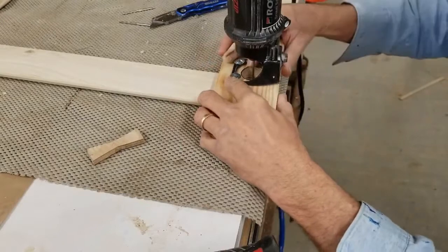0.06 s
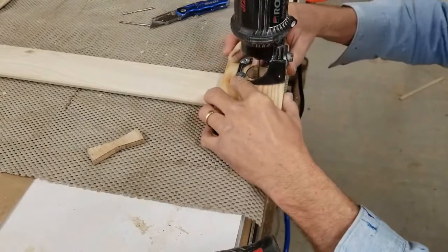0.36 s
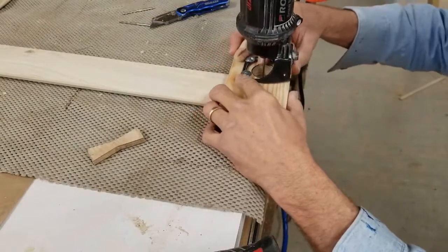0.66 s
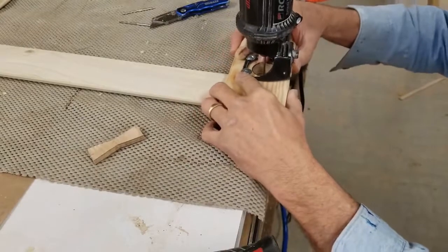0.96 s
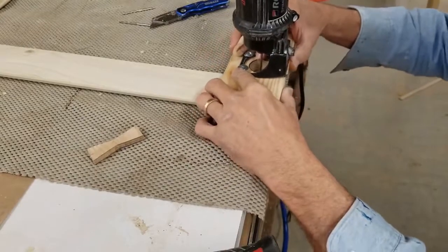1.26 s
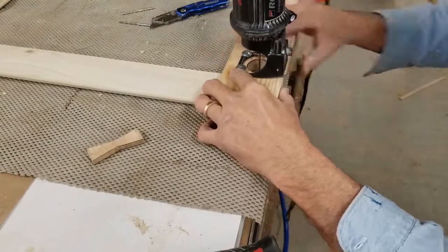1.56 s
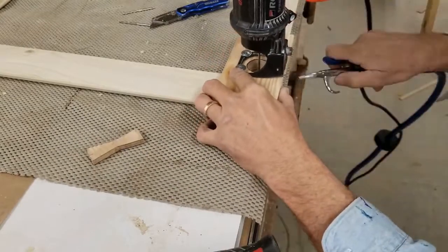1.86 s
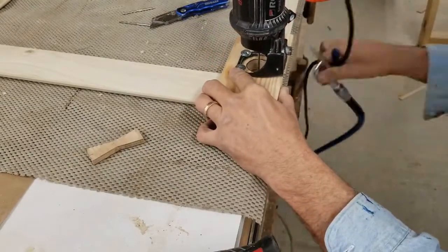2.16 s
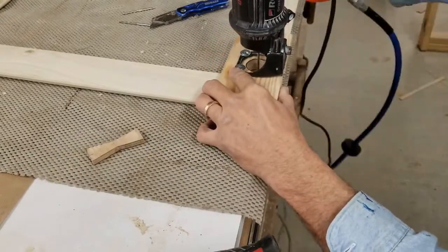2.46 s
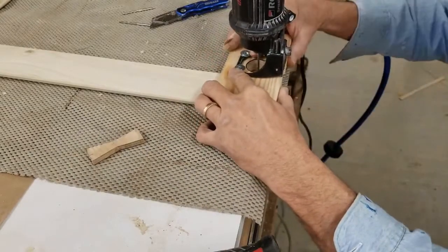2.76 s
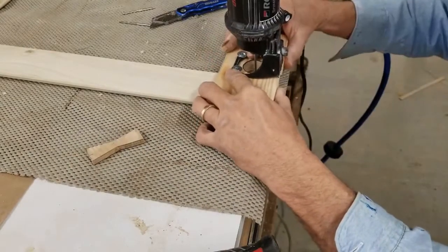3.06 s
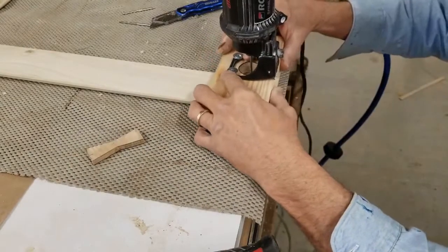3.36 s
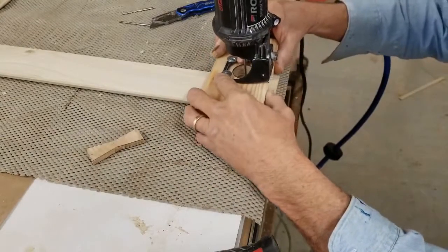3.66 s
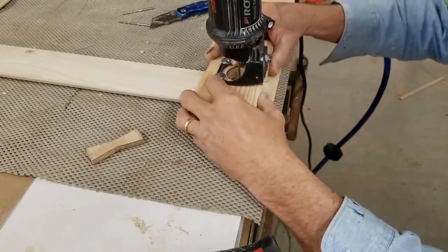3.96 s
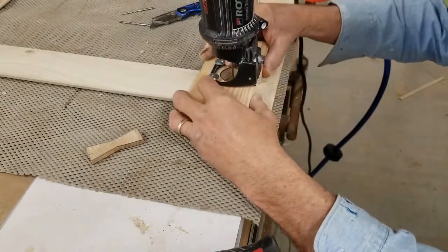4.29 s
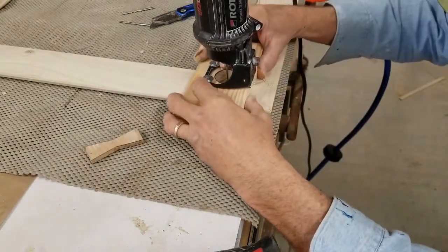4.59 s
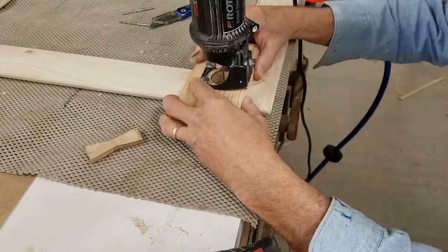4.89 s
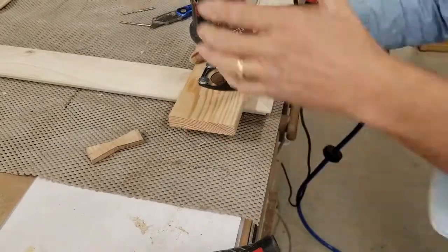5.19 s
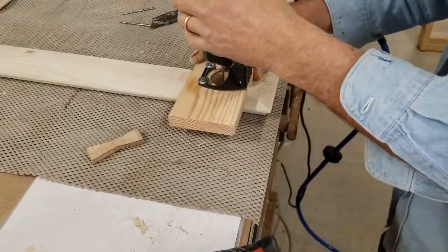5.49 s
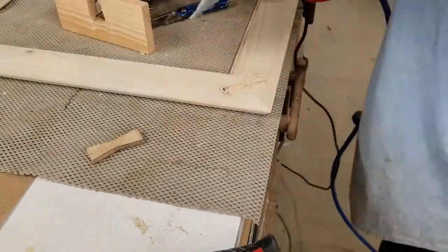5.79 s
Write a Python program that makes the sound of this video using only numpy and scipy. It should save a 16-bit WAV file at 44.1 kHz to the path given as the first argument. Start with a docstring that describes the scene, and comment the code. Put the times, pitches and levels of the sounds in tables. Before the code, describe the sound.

Close by, a small router cuts into a wooden frame in repeated pushes, whining and chattering until its motor is switched off and runs down.

```python
"""At a workbench in a quiet workshop, a small handheld router cuts a recess in a wooden frame, close by.
The two cutting edges of its bit whine, rasp and chatter in the wood, and the work drags the speed down.
Its motor hums, its cooling fan rushes, and an air gun gives one short blast partway through.
The motor is switched off and runs down, and the wooden template scrapes and bumps as it is lifted away."""
import sys
import numpy as np
from scipy import signal
from scipy.fft import rfft, irfft, next_fast_len
from scipy.io import wavfile
from scipy.ndimage import uniform_filter1d, map_coordinates

SR = 44100
rng = np.random.default_rng(int(sys.argv[2]) if len(sys.argv) > 2 else 0)


def file_out(sig):
    """Save sig as 16-bit WAV at sys.argv[1]."""
    # one column per channel
    cols = np.atleast_2d(sig).T
    # limit, then scale
    lim = np.clip(cols, -1, 1)
    pcm = np.round(lim * 32767).astype(np.int16)
    wavfile.write(sys.argv[1], SR, pcm)


N = 266348
TIME = np.arange(N) / SR

# how fast the shaft spins under power: (time [s], speed [turns per second])
SHAFT_SPEED = [(0, 478), (.21, 478), (.29, 458), (.48, 465), (.59, 458.5), (.78, 458), (.87, 469.5),
               (1.15, 471), (1.32, 464.5), (1.65, 465.5), (2.25, 470), (2.7, 478), (2.96, 474), (3.11, 459),
               (3.25, 460), (3.37, 451.5), (3.62, 451), (3.78, 442), (3.89, 455), (4.09, 446), (4.19, 457),
               (4.4, 447), (4.56, 458), (4.89, 453.5), (5.08, 475), (5.18, 478)]
# tones of the cutting edges: (multiple of shaft speed, dull stroke [relative dB],
# sharp stroke [relative dB])
EDGE_TONES = [(2, -22.5, -21), (4, -0.5, -31.5), (6, -9, -10.5), (8, -35, 0.5), (10, -20.5, -16.5),
              (12, -16, -9.5), (14, -29.5, -18), (16, -31.5, -20), (18, -25.5, -15), (20, -26, -13.5),
              (24, -28, -21), (28, -28, -15)]
# the bit is pushed into the wood: (start [s], end [s], rasp [relative dB], chip hiss [relative dB],
# dull stroke [relative dB], sharp stroke [relative dB], overtone boost [dB])
PUSHES = [(0.065, 0.184, -26, -29, -46, -47, -6), (0.251, 0.398, -28, -28.5, -22.5, -29.5, 4.5),
          (0.423, 0.478, -26.5, -27.5, -22, -28.5, 0.5), (0.521, 0.665, -27.5, -28.5, -19, -37, 0.5),
          (0.667, 0.804, -29.5, -29.5, -17, -26, 1.5), (0.93, 1.13, -26, -30.5, -24, -33.5, -8.5),
          (1.15, 1.314, -26, -28.5, -21, -25, -1.5), (1.392, 1.506, -27.5, -31, -23.5, -36, -7),
          (1.54, 1.76, -31, -35.5, -31.5, -47, 3), (1.79, 1.945, -29, -33, -32.5, -52, -10),
          (2.318, 2.67, -27.5, -31.5, -43, -55, -6), (2.682, 2.75, -26.5, -31, -31, -42, 7),
          (2.767, 2.99, -28, -32, -34, -50, 1), (2.995, 3.067, -28, -32.5, -26, -30, 3.5),
          (3.079, 3.162, -28.5, -32.5, -20, -24, -5), (3.206, 3.451, -29, -31.5, -20.5, -21.5, -2.5),
          (3.472, 3.605, -28.5, -32, -22, -24, 0), (3.66, 3.868, -26.5, -30.5, -26.5, -34, 3.5),
          (3.92, 4, -26.5, -29, -22, -28.5, 2), (4.018, 4.127, -27, -30.5, -29, -36, 6),
          (4.214, 4.305, -27.5, -29, -22, -27, 5), (4.33, 4.438, -26, -31, -26, -44, 5.5),
          (4.521, 4.625, -26.5, -31, -28, -30, 5), (4.648, 4.914, -26.5, -29.5, -24.5, -27, 5.5),
          (4.95, 5.09, -32.5, -34.5, -32.5, -45, 1)]
# the bit brushes the wood between pushes: (rasp [relative dB], chip hiss [relative dB],
# dull stroke [relative dB], sharp stroke [relative dB])
LIGHT_TOUCH = (-41, -44.5, -37.5, -49)
# the rasp of tearing wood: (frequency [Hz], relative level [dB])
RASP_SPECTRUM = [(25, -35.5), (70, -17), (110, -10.5), (165, -16), (225, -10), (330, -13), (480, -9),
                 (800, -3.5), (1150, -8.5), (1700, 0), (2700, -0.5), (3200, 0), (4150, 1), (4750, -8),
                 (5400, -0.5), (7000, -25.5)]
# the hiss of flying chips: (frequency [Hz], relative level [dB])
CHIP_SPECTRUM = [(1500, -28), (4000, -5), (5500, 1.5), (6800, 0), (9000, -0.5), (10000, 0), (12700, -1.5),
                 (14000, -5.5), (15700, -10)]
# squeals of the bit: (start [s], end [s], start pitch [Hz], end pitch [Hz], level [dB], pitch blur [Hz])
SQUEALS = [(0.102, 0.194, 1434, 1419, -22.5, 2.5), (.52, 0.561, 2180, 2100, -26, 37),
           (0.937, 0.99, 1632, 1640, -21.5, 18), (0.975, 1.136, 1720, 1525, -25.5, 50),
           (1.283, 1.323, 1750, 1730, -23, 40), (1.396, 1.489, 1770, 1604, -23, 21),
           (1.482, 1.527, 1520, 1415, -26.5, 60), (2.62, 2.69, 1205, 1157, -33, 44),
           (2.693, 2.76, 1450, 1420, -27.5, 18), (3.503, 3.517, 2660, 2660, -21, 50),
           (3.67, 3.768, 3930, 3740, -25.5, 380), (3.914, 3.96, 2610, 2560, -28, 160),
           (4.007, 4.14, 2450, 2460, -21, 220), (4.221, 4.267, 2290, 2370, -25.5, 110),
           (4.305, 4.39, 2470, 2440, -24.5, 170), (4.417, 4.46, 1690, 1674, -27, 80),
           (4.538, 4.702, 1662, 1755, -24, 89), (4.759, 4.806, 1687, 1696, -22.5, 100),
           (4.801, 4.85, 1960, 2130, -26, 180), (4.849, 4.932, 2740, 2480, -25, 130),
           (4.883, 4.933, 1704, 1589, -25.5, 140)]
# hum of the unbalanced rotor, the motor's spinning part: (multiple of shaft speed, relative level [dB])
HUM_TONES = [(1, -45.5), (2, -34.5), (3, -40.5), (4, -44), (5, -46), (6, -38.5), (7, -55.5), (8, -54),
             (9, -49.5), (11, -41.5)]
# whistle of the commutator, the motor's turning contacts: (multiple of shaft speed, relative level [dB])
COMMUTATOR_TONES = [(12, -38), (24, -49)]
# whistle of the fan blades: (multiple of shaft speed, relative level [dB])
BLADE_TONES = [(13, -38.5), (26, -54), (29, -54.5)]
# how the two whistles swell and fade: (time [s], commutator boost [dB], fan blade boost [dB])
WHISTLE_BOOSTS = [(0, -4, -16), (.9, 2, -2), (1.5, -2, 5), (1.9, 2, 9), (2.15, -2, -1.5), (3.0, -3, -2),
                  (4.0, 1, -13), (4.95, 3, -4), (5.18, 7, -1)]
# the rush of cooling air: (frequency [Hz], relative level [dB])
FAN_SPECTRUM = [(24, -79.5), (40, -51), (117, -19), (171, -41), (431, -19), (464, -14), (868, -7.5),
                (935, -3), (1010, -10), (1840, -5.5), (1980, -8.5), (2880, -6), (4760, -12.5), (5530, -11),
                (15800, -24.5)]
# pitches at which the motor's case rings: (frequency [Hz], width [Hz], relative level [dB])
CASE_RINGS = [(230, 230, -6.5), (880, 220, 1), (1750, 91, -4), (2160, 170, -3), (2640, 140, -0.5),
              (3180, 130, 3.5), (4180, 220, -4.5), (5100, 330, -6), (6250, 170, -8), (7700, 400, -5.5),
              (11040, 380, -8.5)]
# spurts of the air gun: (start [s], end [s], level [dB])
AIR_SPURTS = [(1.942, 1.972, -12.5), (1.983, 2.019, -14)]
# the hiss of the air jet: (frequency [Hz], relative level [dB])
JET_SPECTRUM = [(30, -33.5), (100, -14), (1000, -10), (2700, -3), (5000, -6), (8000, -3), (11000, -0.5),
                (13500, 4.5), (15000, 1), (15800, -3.5)]
# the template slides off in short scrapes: (start [s], end [s], level [dB])
SCRAPES = [(5.665, 5.686, -71), (5.72, 5.769, -59), (5.788, 5.81, -59)]
# wood rubbing on wood: (frequency [Hz], relative level [dB])
SCRAPE_SPECTRUM = [(200, -7), (800, -3), (1200, 2), (1700, -24), (3800, -22), (7500, -31), (15000, -42)]
# wood bumps on the bench: (start [s], length [s], pitch [Hz], pitch blur [Hz], level [dB])
BUMPS = [(.052, 0.04, 404, 230, -27.5), (0.055, .04, 224, 20, -25), (0.065, 0.034, 119, 6, -21.5),
         (0.43, 0.05, 96, 47, -46), (1.816, 0.05, 110, 6, -29), (1.85, 0.055, 258, 140, -30.5),
         (2.948, 0.055, 225, 14, -43), (4.79, 0.15, 78, 32, -47), (5.756, 0.046, 173, 99, -53),
         (5.809, 0.048, 627, 87, -50.5), (5.848, 0.044, 79.5, 13, -41), (5.945, .045, 88, 20, -49.5),
         (6.004, 0.016, 790, 550, -61)]
# the background noise of the room: (frequency [Hz], relative level [dB])
ROOM_SPECTRUM = [(18, -32), (30, -3), (65, 2), (216, -5), (346, -24), (662, -23), (1170, -33.5),
                 (1340, -25.5), (1480, -36), (1730, -35.5), (15000, -53.5)]

PUSH_RISE_S, PUSH_RELEASE_S = 0.0092, 0.083
OFF_S, STOP_S = 5.18, 5.515  # the motor is switched off; the rotor stops
TOP_HZ = 15780  # upper limit of the treble


def cutting_edges(turns, flutter, dull, sharp, flat=0.007, grain_overtone=6):
    """The bit whines with two strokes a turn; each comes early or late, which blurs the high tones."""
    dull = dull * amp(-1 + 2 * flutter)
    sharp = sharp * amp(-2.5 + 3 * flutter)
    angle = 2 * np.pi * (turns * (1 - flat) + 0.03 * wander(60) + 0.0061 * wander(700))
    whine = np.zeros(N)
    for k, dull_db, sharp_db in EDGE_TONES:
        level = np.hypot(dull * amp(dull_db), sharp * amp(sharp_db))
        if k == grain_overtone:
            level *= amp(grain_boost_db())
        flicker = amp(2.5 * wander(90))
        whine += level * flicker * np.cos(k * angle + 0.48 * wander(90) + 2 * np.pi * rng.random())
    return np.sqrt(2) * whine


def grain_boost_db(fade=0.018):
    """Each push meets the grain differently, which makes one overtone louder or softer."""
    return sum(db * gate(start - fade, end + PUSH_RELEASE_S, fade) for start, end, *_, db in PUSHES)


def tearing_wood(turns, flutter, rasp, chips):
    """Every stroke tears fibres and flings chips; the more the motor slows, the more the cut buzzes."""
    speed, = curves(SHAFT_SPEED)
    slowdown = (speed.max() - speed) / np.ptp(speed)
    buzz_share = np.minimum(0.63 * slowdown ** 2, 0.5)
    strokes = 1 + 0.39 * np.cos(4 * np.pi * turns)
    puffs = strokes * amp(wander(900) + 1.3 * flutter)
    crackle = colour(fibre_noise(turns, 0.1, 0.3) * puffs, RASP_SPECTRUM)
    buzz = colour(rubbing(turns), RASP_SPECTRUM)
    grind = np.sqrt(1 - buzz_share) * crackle + np.sqrt(buzz_share) * buzz
    spray = colour(fibre_noise(turns, 0.1, 0.14) * puffs, CHIP_SPECTRUM)
    return amp(3) * rasp * grind + amp(0.5) * chips * spray


def fibre_noise(turns, half_turn_echo, full_turn_echo, steps=96):
    """Noise that partly repeats with every turn, as each edge meets nearly the same fibres again."""
    feedback = np.zeros(steps + 1)
    feedback[[0, steps // 2, steps]] = 1, -half_turn_echo, -full_turn_echo
    fibres = signal.lfilter([1], feedback, rng.standard_normal(2 * N))
    return map_coordinates(fibres, [turns * steps], order=3)


def rubbing(turns):
    """The bit rubs the wall of the cut and buzzes with a stack of wavering tones."""
    buzz = np.zeros(N)
    for k in range(5, 15):
        level = amp(7.6 * wander(30))
        buzz += level * np.cos(2 * np.pi * (k * turns + rng.random()) + 0.11 * k * wander(70))
    return buzz


def chatter(octave_db=-10.5):
    """The bit bounces against the grain and squeals, out of tune with the shaft."""
    out, shake = np.zeros(N), amp(2 * wander(200))
    for start, end, hz, end_hz, db, blur in SQUEALS:
        at, envelope, phase = burst(start, end, hz, end_hz, blur)
        out[at] += np.sqrt(2) * amp(db) * envelope * (np.sin(phase) + amp(octave_db) * np.sin(2 * phase))
    return out * shake


def judder(jumps_per_s=23.58):
    """The cut's loudness jumps quickly and at random around its average."""
    jumps = rng.standard_normal(N // 100)[(TIME * jumps_per_s).astype(int)]
    return unit(np.tanh(0.31 * uniform_filter1d(jumps, 200) + 0.4 * wander(90)))


def pushing(column, release):
    """One sound of the cut swells with each push, then sinks back to a light touch."""
    gain = np.full(N, amp(LIGHT_TOUCH[column]))
    for start, end, *levels_db in PUSHES:
        push = held(start - PUSH_RISE_S / 2, end, PUSH_RISE_S, release)
        gain = np.maximum(gain, amp(levels_db[column]) * push)
    return gain


def shaft_turns(coast_hz=448, coast_decay_s=0.218, step_s=0.0422):
    """Counts the shaft's turns; after switch-off the pitch falls in short sliding steps."""
    steps, part = np.divmod(np.maximum(TIME - OFF_S, 0), step_s)
    coasted_s = step_s * (steps + 0.5 + 0.4 * (part - 0.5))
    speed = np.where(TIME < OFF_S, curves(SHAFT_SPEED)[0], coast_hz * np.exp(-coasted_s / coast_decay_s))
    return np.cumsum(speed * (1 + 0.002015 * wander(70))) / SR


def effort(gain, full_db, smooth_s=0.087):
    """How hard the cut works the motor, from 0 to 1, smoothed because the rotor is heavy."""
    return uniform_filter1d(np.minimum(gain / amp(full_db), 1), int(smooth_s * SR))


def motor(turns, load, contact):
    """Rotor, commutator and blades sing; contact passes the hum into the wood, load softens all three."""
    commutator_db, blades_db = curves(WHISTLE_BOOSTS)
    hum_db = -8 + 11.4 * contact - 7.6 * load ** 2
    out = np.zeros(N)
    for tones, boost_db in ((HUM_TONES, hum_db), (COMMUTATOR_TONES, commutator_db - 3 * load),
                            (BLADE_TONES, blades_db - 8 * load)):
        for k, db in tones:
            phase = 2 * np.pi * (k * turns + rng.random()) + 0.0049 * k * wander(200)
            flutter_db = 2.5 * wander(21.895)
            out += np.sqrt(2) * amp(db + boost_db + flutter_db) * np.cos(phase)
    return out


def fan(powered, air_db=-26.5):
    """Cooling air rushes through the vents and dies away as the motor runs down."""
    coasting = run_down(start_db=-32.5, fall_db=23, release=0.007)
    return noise(FAN_SPECTRUM) * amp(air_db) ** powered * coasting ** (1 - powered)


def coasting_rotor(turns, shaft_db=12, commutator_db=8.5, uneven_db=16.5, rumble_gain=0.55):
    """The slowing rotor's tones slide down and ring the case, over the rumble of the bearings."""
    at = np.flatnonzero(gate(OFF_S, STOP_S + 0.05, 0.01))
    speed = np.gradient(turns)[at] * SR
    whirr, power = np.zeros((2, len(at)))
    for k, (strength, offset) in enumerate(rng.random((110, 2)), 1):
        on_commutator = k % COMMUTATOR_TONES[0][0] == 0
        db = shaft_db if k == 1 else max(uneven_db * strength ** 3, commutator_db * on_commutator)
        level = amp(db) * case_gain(k * speed) * (k * speed < TOP_HZ)
        whirr += level * np.cos(2 * np.pi * (k * turns[at] + offset))
        power += level ** 2
    rumble_spectrum = rfft(rng.standard_normal(N)) * case_gain(np.fft.rfftfreq(N, 1 / SR))
    rumble = unit(irfft(rumble_spectrum, N))
    out = np.zeros(N)
    out[at] = unit(unit(whirr / np.sqrt(power)) + rumble_gain * rumble[at])
    return out * run_down(start_db=-31.5, fall_db=16, release=0.0093)


def case_gain(f, floor_db=-20.5):
    """The motor's case favours frequencies near those at which it rings."""
    peaks = sum(amp(2 * db) / (1 + ((f - hz) / width) ** 2) ** 2 for hz, width, db in CASE_RINGS)
    return np.sqrt(peaks + amp(2 * floor_db))


def run_down(start_db, fall_db, release):
    """A coasting sound fades ever faster and ends when the rotor stops."""
    progress = np.clip((TIME - OFF_S) / (STOP_S - OFF_S), 0, 1)
    return amp(start_db - fall_db * progress ** 2) * held(-1, STOP_S, 1, release)


def air_gun(leak_db=-17.5):
    """Compressed air leaves the nozzle in two quick spurts; the valve does not quite close in between."""
    spurts = sum(amp(db) * held(start, end, 0.009, 0.005) for start, end, db in AIR_SPURTS)
    leak = amp(leak_db) * gate(AIR_SPURTS[0][0], AIR_SPURTS[-1][1], 0.005)
    return noise(JET_SPECTRUM) * np.maximum(spurts, leak)


def wood_handling():
    """The template scrapes off the frame, and wood bumps dully on the padded bench."""
    sliding = sum(amp(db) * held(start, end, 0.041, 0.004) for start, end, db in SCRAPES)
    out = noise(SCRAPE_SPECTRUM) * sliding
    for start, length, hz, blur, db in BUMPS:
        at, envelope, phase = burst(start, start + length, hz, hz, blur)
        out[at] += np.sqrt(2) * amp(db) * envelope * np.sin(phase)
    return out


def workshop(room_db=-57.5, tone_hz=1324, tone_db=-74):
    """The quiet room murmurs, with one faint tone that stops shortly before the end."""
    tone = np.sqrt(2) * amp(tone_db) * np.sin(2 * np.pi * tone_hz * TIME) * gate(0, 5.78, 0.05)
    return amp(room_db) * noise(ROOM_SPECTRUM) + tone


def amp(db):
    """Turns decibels into a gain to multiply by."""
    return 10 ** (np.asarray(db) / 20)


def unit(x):
    """Scales a signal to an average strength (rms) of 1."""
    return x / np.sqrt(np.mean(x ** 2) + 1e-20)


def curves(rows):
    """Joins each column of a table with straight lines over time."""
    times, *columns = np.transpose(rows)
    return [np.interp(TIME, times, column) for column in columns]


def gate(start, end, fade):
    """Fades in to 1 after the start and back to 0 by the end."""
    return np.clip(np.minimum(TIME - start, end - TIME) / fade, 0, 1)


def held(start, end, rise, release):
    """Rises to 1, holds until the end time and then dies away."""
    return np.clip((TIME - start) / rise, 0, 1) * np.exp(-np.maximum(TIME - end, 0) / release)


def colour(x, spectrum):
    """Shapes a sound's lows and highs by a table, at strength 1."""
    hz, db = np.transpose(spectrum)
    size = next_fast_len(N)
    f = np.fft.rfftfreq(size, 1 / SR)
    gain = amp(np.interp(np.log(f + 1), np.log(hz), db))
    return unit(irfft(rfft(x, size) * gain, size)[:N])


def noise(spectrum):
    """Random noise shaped by a table."""
    return colour(rng.standard_normal(N), spectrum)


def wander(rate):
    """A random curve of strength 1 that heads for a new value `rate` times a second."""
    return unit(np.interp(TIME * rate, np.arange(8000), rng.standard_normal(8000)))


def burst(start, end, hz, end_hz, blur):
    """A short gliding vibration, blurred by random drift: (sample positions, envelope, phase)."""
    at = np.arange(round(start * SR), min(round(end * SR), N))
    drift = rng.standard_normal(SR // 4)[:len(at)] * np.sqrt(2 * np.pi * blur / SR)
    drift = uniform_filter1d(drift, max(int(SR / (4 * blur + hz / 2)), 1))
    phase = np.cumsum(2 * np.pi * np.linspace(hz, end_hz, len(at)) / SR + drift)
    return at, signal.windows.tukey(len(at), 0.31), phase


def scene():
    """Adds up router, air gun, wood handling and room, the same in both channels."""
    turns, flutter = shaft_turns(), judder()
    powered = gate(-1, 5.205, 0.037)
    rasp, chips = pushing(0, PUSH_RELEASE_S), pushing(1, PUSH_RELEASE_S)
    dull, sharp = pushing(2, release=0.04), pushing(3, release=0.013)  # the sharp stroke stops first
    load, contact = effort(dull, full_db=-25.5), effort(rasp, full_db=-28.5)
    running = motor(turns, load, contact) + cutting_edges(turns, flutter, dull, sharp)
    running += tearing_wood(turns, flutter, rasp, chips) + chatter()
    router = powered * running + fan(powered) + coasting_rotor(turns)
    mix = router + air_gun() + wood_handling() + workshop()
    return np.array([mix, mix])


def record(dry):
    """Cuts off the very highest treble."""
    low_pass = signal.firwin(511, TOP_HZ, window=("kaiser", 9), fs=SR)
    return signal.oaconvolve(dry, low_pass[None], "same")


dry = scene()
out = record(dry)
file_out(out)
```